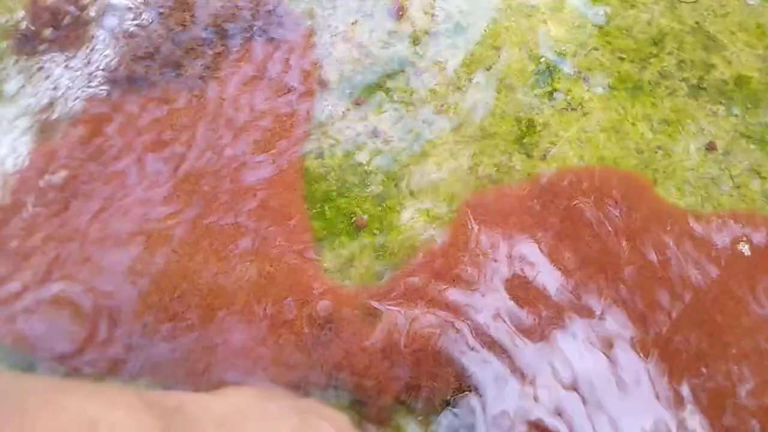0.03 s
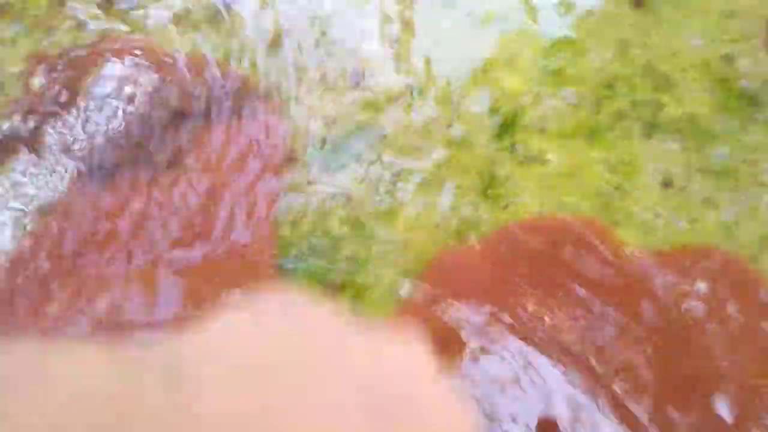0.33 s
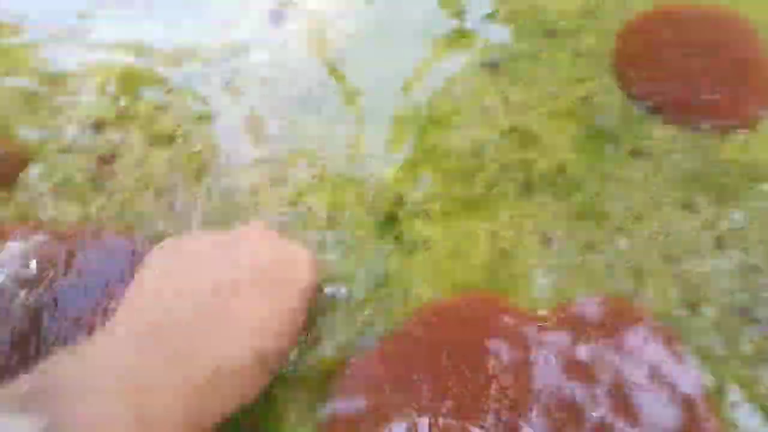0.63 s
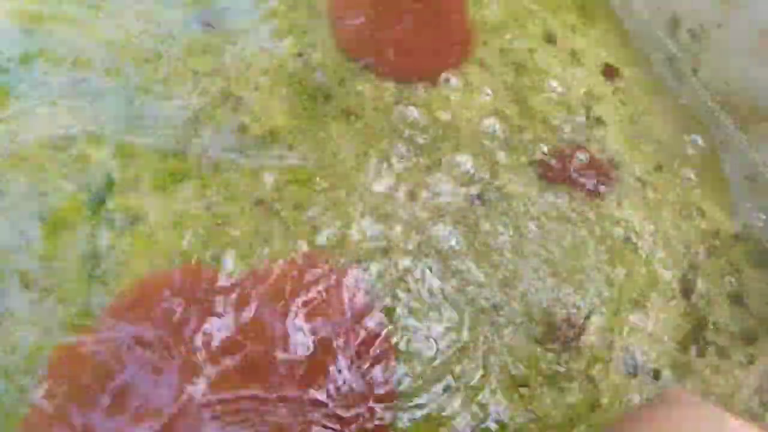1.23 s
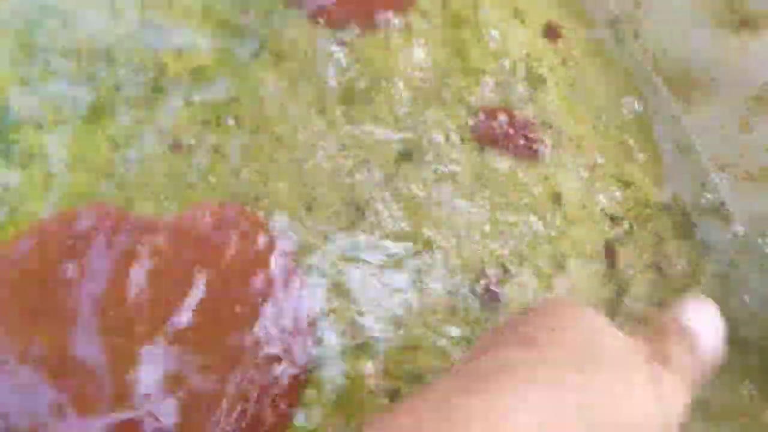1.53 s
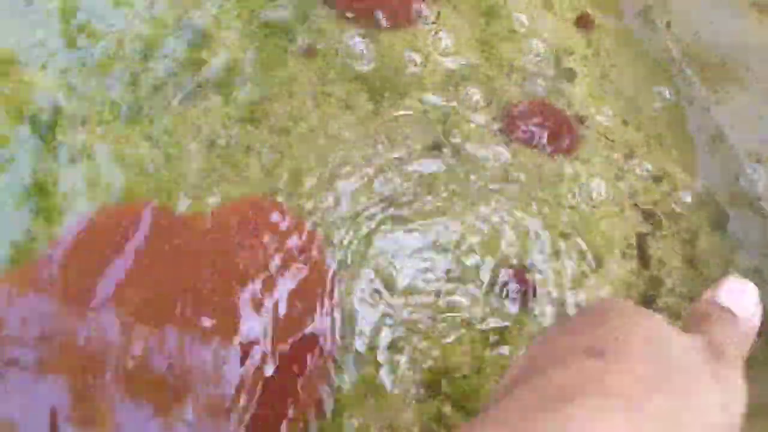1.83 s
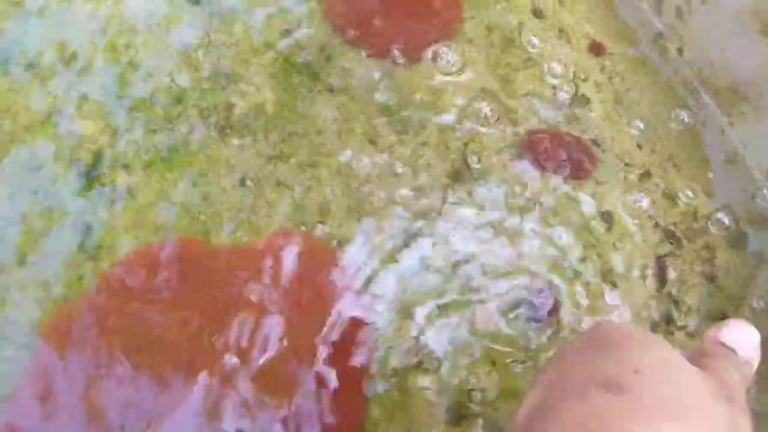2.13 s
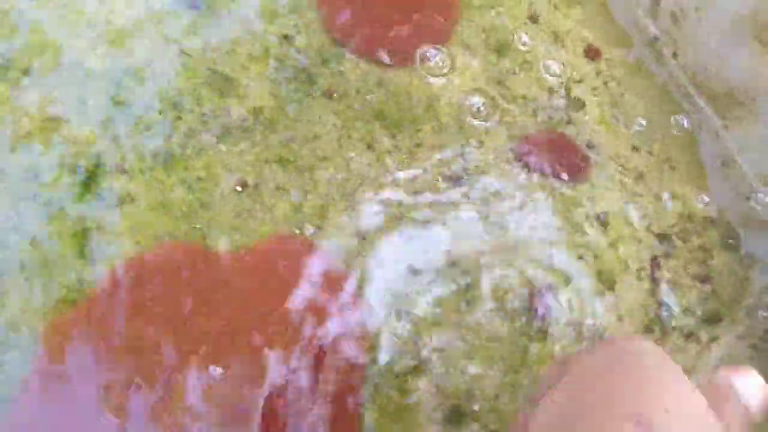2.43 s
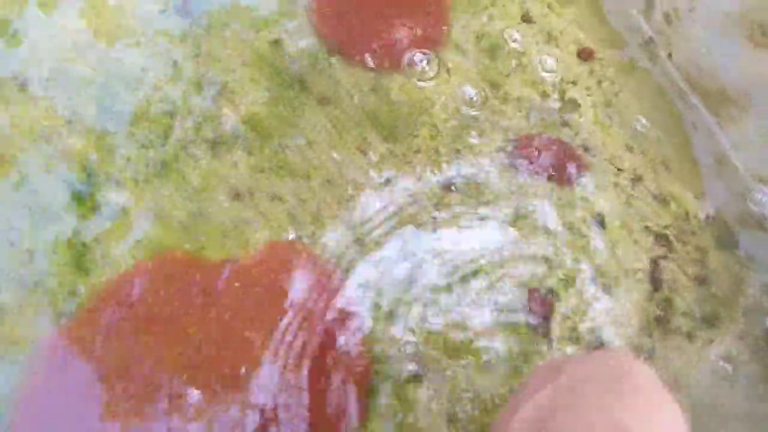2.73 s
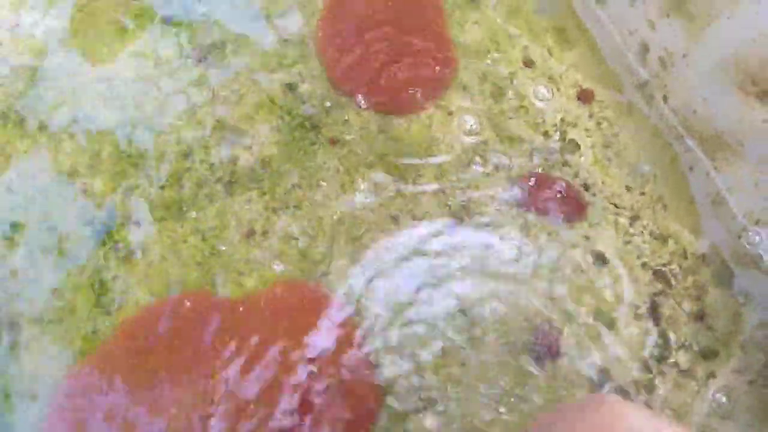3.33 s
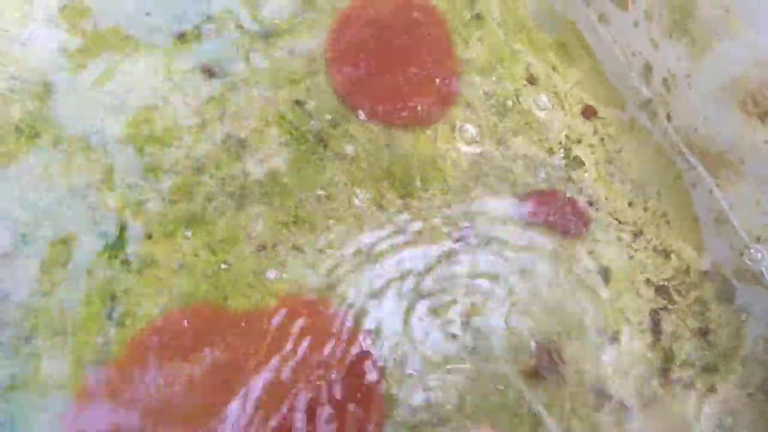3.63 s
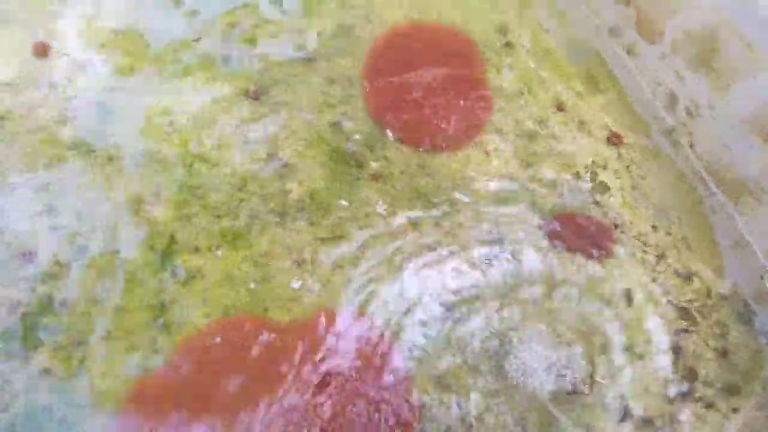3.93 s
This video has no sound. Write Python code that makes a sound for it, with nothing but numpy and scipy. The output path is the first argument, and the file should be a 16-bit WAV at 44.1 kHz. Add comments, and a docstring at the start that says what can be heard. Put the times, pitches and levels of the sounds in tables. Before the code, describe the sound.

Close to the microphone, a thin stream of water splashes into a shallow outdoor pool with fizzing bubbles and a few glugs. It eases into a light, slightly hollow trickle and picks up near the end.

```python
"""A shallow basin, heard from close above, with a thin stream of water running in: a lively splatter
at first, then a softer trickle that swells again near the end. Droplets tick on the surface and
trapped air rings as fizz, plinks, gurgles and glugs, over a faint outdoor rumble.
Close reflections hollow the tone; the microphone rings in the treble."""
import sys
import numpy as np
from scipy import signal
from scipy.io import wavfile

SR = 44100
rng = np.random.default_rng(int(sys.argv[2]) if len(sys.argv) > 2 else 0)


def to_wav(s):
    """Save 16-bit WAV."""
    ch = np.atleast_2d(s).T  # columns
    pcm = np.round(np.clip(ch, -1, 1) * 32767)  # PCM
    wavfile.write(sys.argv[1], SR, pcm.astype(np.int16))


N = 176400
T = np.arange(N) / SR
SPRAY_PER_S, SPRAY_LOW_HZ, DROP_FADE_S = 3000, 2200, .0019


def from_db(db):
    """Decibels to gain."""
    return 10 ** (np.asarray(db) / 20)


def unit_rms(x):
    """Scale to unit level."""
    return x / np.sqrt(np.mean(x ** 2) + 1e-20)


def curves(rows):
    """One automation curve for each column after the time."""
    times, *columns = np.transpose(rows)
    return [np.interp(T, times, column) for column in columns]


def waver(times, per_s):
    """A random line that takes a new course per_s times a second."""
    knots = np.arange(0, times[-1] + 1, 1 / per_s)
    return np.interp(times, knots, rng.standard_normal(len(knots)))


def cut(x, hz, kind, order=2):
    """High- or low-pass."""
    return signal.sosfilt(signal.butter(order, hz, kind, fs=SR, output="sos"), x + 1e-18)


def moving_eq(x, db_at):
    """Filter by a gain in dB that depends on time and frequency."""
    window = dict(nperseg=1024, noverlap=768)
    hz, times, frames = signal.stft(x, SR, **window)
    return signal.istft(frames * from_db(db_at(times, hz[:, None])), SR, **window)[1][:N]


def ring(rows, attack_cycles=.7, pitch_rise=.069):
    """Each bubble rings as a sine that rises in pitch and fades 60 dB over its cycles."""
    out = np.zeros(N + SR)
    for start_s, hz, gain, cycles in rows:
        age = np.arange(int(cycles / hz * SR)) * hz / (cycles * SR)   # 0 to 1
        attack = 1 - np.exp(-(cycles * age / attack_cycles) ** 2)
        decay = np.exp(-np.log(1000) * age)
        tone = np.sin(2 * np.pi * cycles * (age + pitch_rise * age * age / 2))
        start = int(start_s * SR)
        out[start:start + len(age)] += gain * attack * decay * tone
    return out[:N]


def bubbles(sizes, per_s, cycles, spread_db, tuning=np.ones(N)):
    """A random swarm of bubbles, each pitch scaled by tuning at birth; unit level."""
    hz, db = np.transpose(sizes)
    swarm_rng = np.random.default_rng(rng.integers(2 ** 31))
    when, size, force, life = swarm_rng.random((int(per_s * N / SR), 4)).T
    pitch = hz[0] * (hz[-1] / hz[0]) ** size
    gain = from_db(np.interp(np.log(pitch), np.log(hz), db) - spread_db * np.log(force + .022))
    swarm = ring(zip(when * N / SR, pitch * tuning[(when * N).astype(int)], gain, cycles * (.5 + life)))
    return unit_rms(cut(swarm, hz[0] * tuning.min() * 1.178, "high", order=10))


def splat(impacts, fade_s):
    """Each impact bursts into a tiny dying crackle with no low body."""
    decay = np.exp(-2 / (fade_s * SR))
    envelope = np.sqrt(signal.lfilter([1], [1, -decay], impacts ** 2 + 1e-18))
    crackle = cut(envelope * rng.standard_normal(N), SPRAY_LOW_HZ, "high")
    return cut(crackle, 940, "high", order=4)


def spray(flow):
    """Clusters of droplets merge into a wash as the flow grows, with tiny bubbles and mist."""
    # the tiniest bubbles, thrown in by the spray: pitch_hz, relative_db
    bead_sizes = [(5600, -6), (7000, -2.4), (8500, 1), (10000, 1.5)]
    clusters = from_db(1.4 * waver(T, per_s=110))
    sizes = from_db(5.5 * np.minimum(rng.exponential(1, N), 3.6)) / flow ** .25
    impacts = (rng.random(N) < flow * SPRAY_PER_S / SR) * sizes
    beads = from_db(-9) * bubbles(bead_sizes, per_s=2200, cycles=56, spread_db=4.5)
    patter = unit_rms(splat(impacts, fade_s=.0022))
    mist = .28 * cut(rng.standard_normal(N), SPRAY_LOW_HZ, "high")
    return unit_rms(clusters * (patter + beads) + mist)


def stream():
    """Spray and the fine bubbles it stirs in follow the flow and flare up in each splash."""
    # strength of the stream: time_s, spray_db, fizz_db
    flow = [(0, -41.5, -42.5), (.3, -42, -45), (.48, -45, -45.5), (.58, -45, -45), (.68, -46.5, -43),
            (.86, -44, -41), (1.05, -45.5, -47), (1.2, -50, -52), (1.38, -49, -49.5), (1.5, -50, -55.5),
            (1.75, -48, -52.5), (2.0, -50, -54), (2.5, -50.5, -55.5), (3.0, -50, -55), (3.35, -50, -57),
            (3.64, -51.5, -55.5), (3.72, -48.5, -45.5), (4.0, -48, -47)]
    # splashes as the stream breaks up: centre_s, half_length_s, spray_db, fizz_db
    splashes = [(0.448, 0.011, -75, -49), (1.589, 0.018, -39, -68), (1.72, 0.016, -47, -69),
                (1.917, 0.017, -44, -52), (2.305, 0.014, -42.5, -50), (3.444, 0.011, -43.5, -54),
                (3.696, 0.024, -44, -38)]
    # fine bubbles: pitch_hz, relative_db
    fizz_sizes = [(2300, 7), (2900, 0), (3600, 3), (4400, 0.5), (5400, 0), (6400, 3.5)]
    spray_gain, fizz_gain = from_db(curves(flow))
    for centre_s, half_length_s, spray_db, fizz_db in splashes:
        flare = np.exp(-((T - centre_s) / half_length_s) ** 2)
        spray_gain = np.hypot(spray_gain, flare * from_db(spray_db))
        fizz_gain = np.hypot(fizz_gain, flare * from_db(fizz_db))
    splatter = spray_gain * spray(spray_gain / spray_gain.mean())
    return splatter + fizz_gain * bubbles(fizz_sizes, per_s=1700, cycles=42, spread_db=3.8)


def churn():
    """Larger bubbles ring where the stream plunges in; hardly any outgrow the pocket it digs."""
    # mid-sized bubbles and low slopping: time_s, level_db
    gurgle_levels = [(0, -54.5), (.5, -51.5), (.78, -49.5), (1.0, -54), (1.25, -53.5), (1.6, -57.5),
                     (2.2, -55), (2.6, -55), (2.98, -60), (3.4, -58), (3.62, -58), (3.8, -54.5),
                     (4.0, -54.5)]
    slop_levels = [(0, -65), (.3, -73), (.45, -69.5), (.6, -67), (.76, -68), (.92, -77), (1.11, -64.5),
                   (1.22, -86), (1.3, -81), (1.45, -85.5), (2.26, -114), (2.305, -71), (2.36, -103),
                   (2.68, -104), (2.73, -69), (2.82, -103), (3.6, -89), (4.0, -80)]
    # the pocket, which tunes the deep bubbles: time_s, pitch_hz, level_db
    pocket = [(0, 488, -56), (.45, 497, -55.5), (.62, 485, -57.5), (.76, 396, -57.5), (.9, 551, -59.5),
              (1.08, 494, -60), (1.28, 652, -63), (2.03, 605, -68), (2.14, 735, -68.5), (2.3, 650, -63.5),
              (2.84, 617, -63.5), (2.98, 900, -78), (3.1, 620, -64), (3.5, 662, -64.5), (3.64, 675, -70),
              (3.76, 528, -60.5), (3.86, 452, -56), (4.0, 485, -58.5)]
    # bubble swarms: pitch_hz, relative_db
    gurgle_sizes = [(720, 3.3), (900, 0.88), (1300, 6.2), (1650, 7.1), (2000, 11.5), (2400, 17.3)]
    slop_sizes = [(130, -11), (220, -15), (380, 5)]
    deep_sizes = [(450, 1.5), (500, 5.5), (620, 0), (850, 0.5)]   # before tuning to the pocket
    plunge_sizes = [(1850, 3), (2150, -9), (2500, -13)]   # the commonest under the stream
    gurgle_gain, = from_db(curves(gurgle_levels))
    slop_gain, = from_db(curves(slop_levels))
    pocket_hz, pocket_db = curves(pocket)
    gurgle = bubbles(gurgle_sizes, per_s=500, cycles=46, spread_db=1.6)
    plunge = from_db(-6.5) * bubbles(plunge_sizes, per_s=120, cycles=60, spread_db=1.5)
    deep = bubbles(deep_sizes, per_s=290, cycles=26, spread_db=1.8, tuning=pocket_hz / deep_sizes[1][0])
    slop = bubbles(slop_sizes, per_s=170, cycles=9, spread_db=1.0)

    def low_shelf(times, hz, depth_db=27, width_hz=40):
        edge_hz = .78 * np.interp(times, T, pocket_hz)
        return -depth_db * (.5 - .5 * np.tanh((hz - edge_hz) / width_hz))
    trapped_air = gurgle_gain * (gurgle + plunge) + from_db(pocket_db) * deep
    return moving_eq(trapped_air, low_shelf) + slop_gain * slop


def rumble():
    """A faint outdoor rumble that eases off."""
    # low background: time_s, level_db
    levels = [(0, -79), (1.3, -83), (1.5, -87), (4.0, -87.5)]
    gain, = from_db(curves(levels))
    low_noise = cut(rng.standard_normal(N), 124, "low", order=1)
    return gain * unit_rms(cut(low_noise, 48, "high"))


def basin(water):
    """A dull, inverted reflection ripples the mids; a faint bright one sweeps the treble."""
    # close reflection, shifting as the microphone moves: time_s, lag_ms, gain
    echo_path = [(0, .96, .12), (.7, 1.12, .12), (1.15, 1.16, .25), (1.6, 1.14, .42), (2.0, 1.1, .38),
                 (2.4, 1.14, .45), (2.9, 1.165, .62), (3.3, 1.16, .55), (3.65, 1.15, .3), (4.0, 1.13, .15)]
    # bright reflection: time_s, lag_ms
    sheen_path = [(0, 1.03), (.55, .98), (.8, .82), (1.3, .92), (2.1, 1.41), (2.9, 1.41), (4.0, 1.2)]
    echo_ms, echo_gain = curves(echo_path)
    sheen_ms, = curves(sheen_path)
    mids = signal.sosfiltfilt(signal.butter(3, [1050, 5000], "band", fs=SR, output="sos"), water)
    echo = np.interp(T - echo_ms / 1000, T, mids)
    sheen = np.interp(T - sheen_ms / 1000, T, cut(water, 5000, "high"))
    return water - echo_gain * echo + .2 * sheen


def glugs():
    """Big single bubbles ring low."""
    # low bubbles: start_s, pitch_hz, level_db, fade_cycles
    hits = [(0.023, 465, -45, 34), (0.271, 510, -50, 20), (.347, 826, -39.5, 39), (0.751, 345, -39.5, 12),
            (.875, 685, -40, 33), (1.086, 696, -41.5, 28), (1.113, 217, -55, 17), (1.28, 306, -64, 114),
            (2.305, 380, -58, 10), (2.985, 210, -68, 21), (3.733, 657, -44.5, 37)]
    return ring((start_s, hz, from_db(db), cycles) for start_s, hz, db, cycles in hits)


def drops(smack_db=-11, ring_db=-6.5, ring_hz=7600, cycles=24):
    """Each large drop smacks the surface, duller than the spray, and leaves a tiny ringing bubble."""
    # large drops: start_s, relative_db
    hits = [(.031, -22), (0.0362, -16), (.0615, -29), (0.074, -18.5), (0.1135, -18.5), (0.1652, -18),
            (0.1687, -19.5), (.2124, -22), (.2145, -22), (0.3607, -25), (0.368, -24), (0.4426, -14.5),
            (.51, -23), (0.5273, -17.5), (0.6545, -24), (.6904, -24), (0.7312, -19.5), (0.7406, -16),
            (.7963, -23), (0.8152, -20.5), (0.8898, -18), (1.0646, -23), (1.115, -21.5), (1.2868, -23.5),
            (1.4201, -29), (1.437, -26), (1.446, -22.5), (1.5837, -38), (1.5913, -45), (1.6405, -26),
            (1.6967, -24.5), (1.739, -23.5), (1.9156, -30), (2.3757, -29), (2.5763, -25.5), (2.9977, -26),
            (3.0436, -25.5), (3.0718, -26), (3.1212, -21), (3.4335, -26), (3.5785, -37), (3.6286, -31)]
    impacts = np.zeros(N)
    for start_s, db in hits:
        impacts[int(start_s * SR)] = from_db(db + smack_db)
    pitches = ring_hz * rng.uniform(.94, 1.06, len(hits))
    smacks = cut(splat(impacts, DROP_FADE_S), 10500, "low")
    pings = ring((start_s, hz, from_db(db + ring_db), cycles) for (start_s, db), hz in zip(hits, pitches))
    return smacks + pings


def plinks():
    """Small single bubbles ring clear of the fizz."""
    # clear bubbles: start_s, pitch_hz, level_db, fade_cycles
    hits = [(0.15, 2940, -24, 42), (0.5099, 3200, -19.5, 40), (0.5098, 3850, -19, 37),
            (0.5094, 2710, -21.5, 79), (0.5116, 7150, -28.5, 114), (0.7302, 4900, -16, 15),
            (0.998, 2980, -32, 27), (1.044, 4500, -27.5, 42), (1.063, 2720, -30.5, 46),
            (1.3872, 4400, -19.5, 11), (1.704, 1180, -43.5, 41), (1.7147, 4100, -19.5, 19),
            (1.989, 1170, -37, 74), (2, 1370, -35, 16), (2.1467, 3400, -31.5, 22), (2.24, 1310, -41, 70),
            (2.44, 5070, -22.5, 7.5), (2.536, 2900, -36.5, 47), (2.594, 1470, -34.5, 24),
            (2.5951, 4070, -4.5, 2.5), (3.008, 3010, -37.5, 46), (3.14, 4650, -33, 45),
            (3.349, 1910, -37, 39), (3.406, 5160, -27.5, 15), (3.419, 1410, -35.5, 17),
            (3.423, 3700, -18.5, 8.5), (3.446, 4070, -38, 18), (3.487, 1300, -32.5, 10.5),
            (3.698, 3570, -27, 34), (3.76, 3500, -26, 37), (3.89, 5100, -26, 31)]
    tones = ring((start_s, hz, from_db(db), cycles) for start_s, hz, db, cycles in hits)
    return cut(tones, 1000, "high", order=4)


def puffs(half_length_s=.02):
    """Now and then the stream throws up a hiss of very fine spray."""
    # puffs of spray: centre_s, level_db
    bursts = [(1.35, -45), (1.59, -58), (1.82, -63), (1.95, -48), (2.031, -54), (2.12, -44), (2.31, -45),
              (2.46, -45), (2.87, -45.5), (3.04, -42.5), (3.33, -57)]
    gain = sum(from_db(db) * np.exp(-((T - centre_s) / half_length_s) ** 2) for centre_s, db in bursts)
    crackle = splat(rng.random(N) < SPRAY_PER_S / SR, DROP_FADE_S)
    return gain * unit_rms(cut(crackle, 12100, "high"))


def hollow(water, fade_s=.079, wander_hz=30):
    """Narrow bands sink away for a while, wavering in depth and pitch, and hollow out the trickle."""
    # notches in the trickle: start_s, end_s, centre_hz, half_width_hz, typical_depth_db
    notches = [(1.45, 3.95, 1710, 65, 12), (1.42, 2.5, 2790, 80, 18), (2.36, 3.68, 2630, 115, 15),
               (2.93, 3.6, 3440, 110, 17), (2.73, 3.13, 4200, 190, 26), (2.38, 3.68, 4360, 60, 12),
               (3.1, 3.42, 3950, 65, 20)]

    def notch_db(times, hz):
        total = 0
        for start_s, end_s, centre_hz, half_width_hz, depth_db in notches:
            swell = np.maximum(1 + .45 * waver(times, per_s=14), 0)
            offset_hz = hz - centre_hz - wander_hz * waver(times, per_s=14)
            fade = np.clip(.5 + np.minimum(times - start_s, end_s - times) / fade_s, 0, 1)
            total = total - depth_db * fade * swell / (1 + (offset_hz / half_width_hz) ** 6)
        return total
    return moving_eq(water, notch_db)


def scene():
    """The water in its basin over the outdoor rumble, in mono."""
    water = stream() + puffs() + churn() + glugs() + drops() + plinks()
    return (rumble() + hollow(basin(water)))[None]


def record(dry):
    """The microphone's port rings in the treble; the very top is cut."""
    # port resonances: pitch_hz, width_hz, boost_db
    resonances = [(7600, 1870, 11), (6890, 290, 5), (7607, 186, 7), (8070, 230, 6), (8800, 680, 4.5)]
    for hz, width_hz, boost_db in resonances:
        b, a = signal.iirpeak(hz, hz / width_hz, fs=SR)
        dry = dry + (from_db(boost_db) - 1) * signal.lfilter(b, a, dry)
    return signal.sosfilt(signal.ellip(12, .2, 80, 15800, fs=SR, output="sos"), dry)


dry = scene()
out = record(dry)
to_wav(out)
```